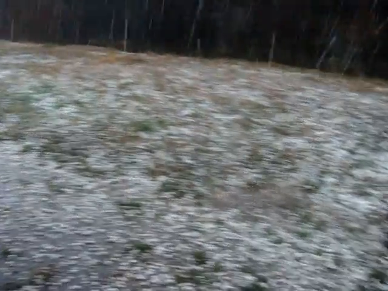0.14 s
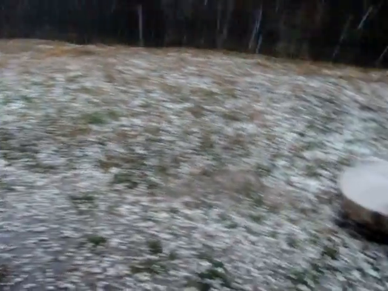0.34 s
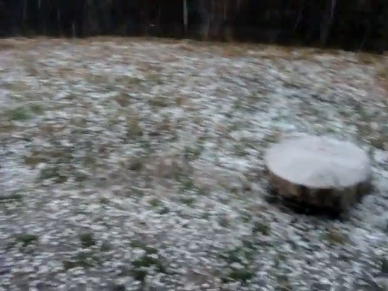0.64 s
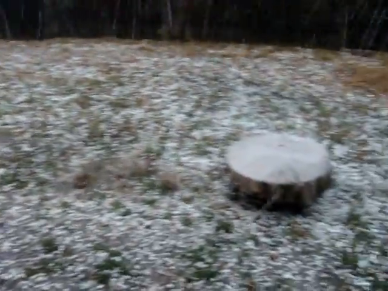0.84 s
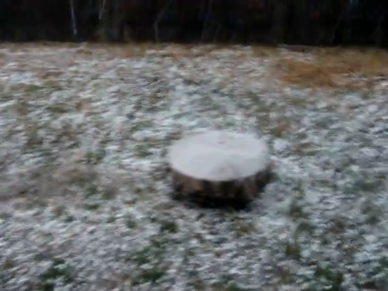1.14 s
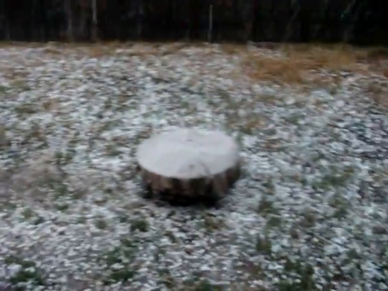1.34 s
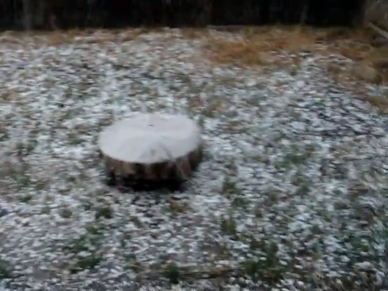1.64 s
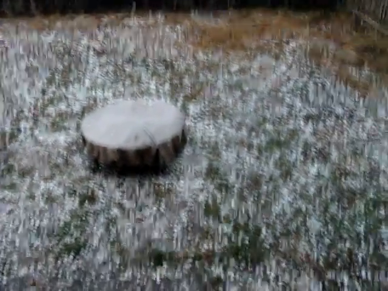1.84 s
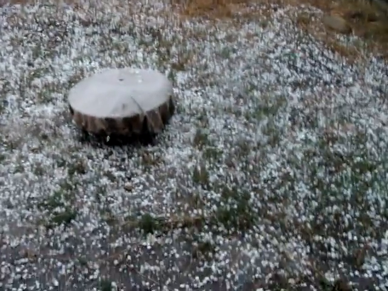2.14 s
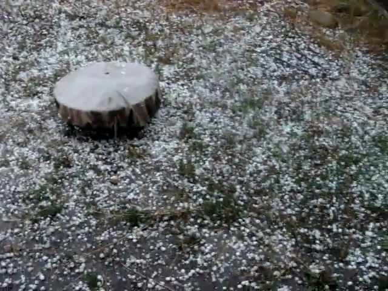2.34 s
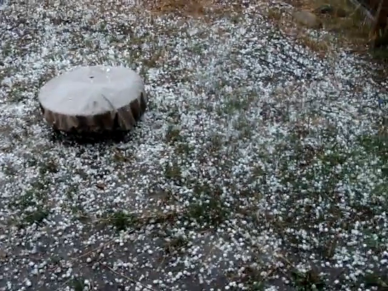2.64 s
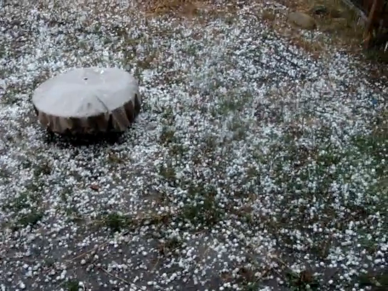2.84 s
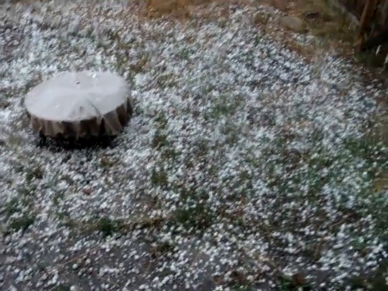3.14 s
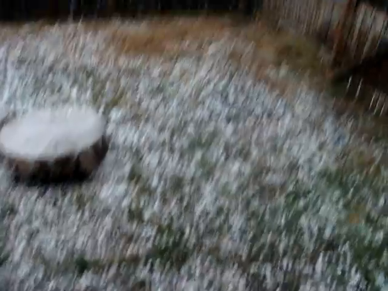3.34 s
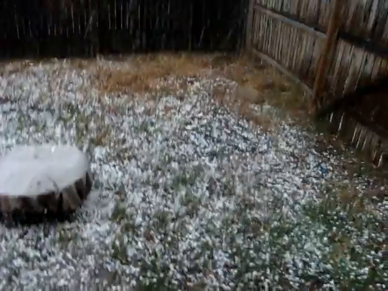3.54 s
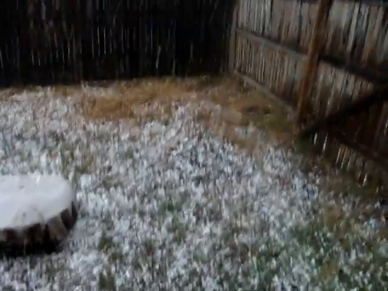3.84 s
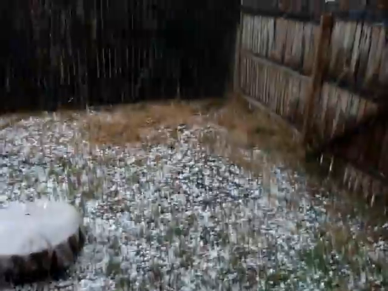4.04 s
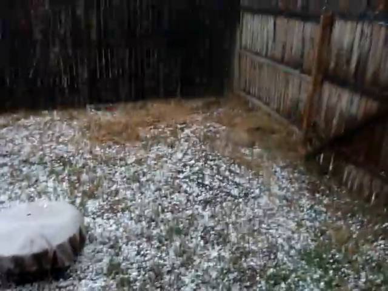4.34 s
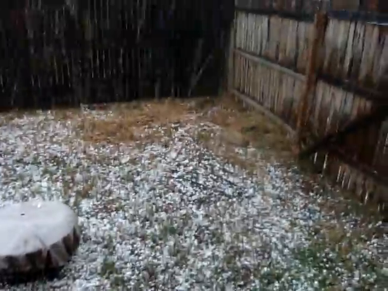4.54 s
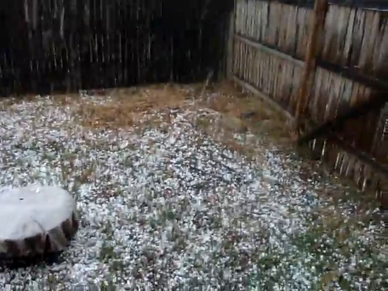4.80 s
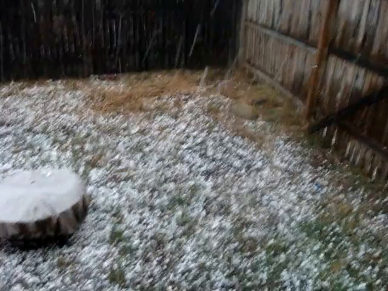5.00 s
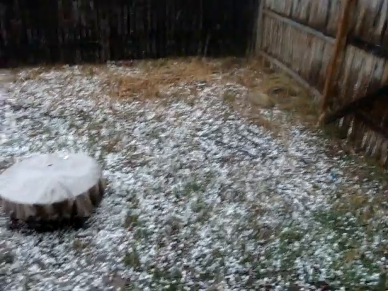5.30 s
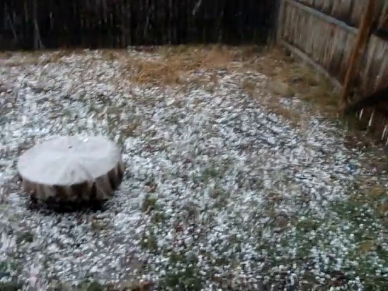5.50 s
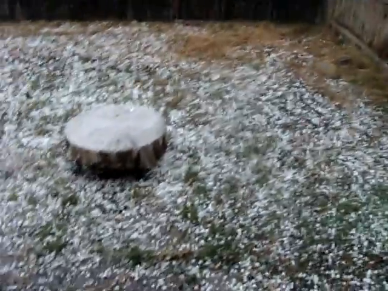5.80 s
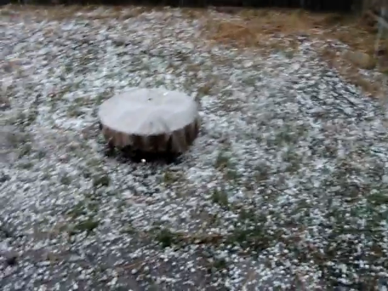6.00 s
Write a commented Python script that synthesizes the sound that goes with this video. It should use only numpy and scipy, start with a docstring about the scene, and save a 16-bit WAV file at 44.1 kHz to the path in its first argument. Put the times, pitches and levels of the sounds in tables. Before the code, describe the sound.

From 0 to about 6.2 seconds, heavy hail pounds a fenced yard without a break, already at full strength at the start. Far stones blend into a broad, mid-bright wash; nearer ones patter on lawn and paving, clack on fallen ice and fizz into splinters. Beneath lies a dull roar and rapid drumming on wooden fence and roof. Very short, snapping cracks land close by at 0.2, 0.7 and 1.3 seconds, then in a tight cluster from 1.7 to 1.9, the loudest at 1.9. More follow at 2.9, 3.9, 4.4, 5.2 and a strong one near 5.6. Low board knocks appear faintly around 1.4, 4.1 and 5.7. Quick flurries ripple the level, which eases slightly at the very end. Mono, dry and close, with softened top treble and brief ducking after hard peaks.

```python
"""A fenced back yard, heard from the edge of a paved patio, under heavy hail.
Far stones merge into a wash of noise and a low roar, shaped by smooth spectra. Nearer stones are random
clicks: they patter on the lawn, click on ice already lying there, fizz as splinters and drum on wood.
Big stones knock on wood by setting off ringing filters. Others crack close by, each a short ping with
a burst of tiny snaps, and their peaks make the mono recorder's limiter duck."""
import sys
import numpy as np
from scipy import signal
from scipy.fft import rfft, irfft, next_fast_len
from scipy.io import wavfile

SR = 44100
rng = np.random.default_rng(int(sys.argv[2]) if len(sys.argv) > 2 else 0)


def store_pcm(level_fs):
    """Save levels as 16-bit WAV."""
    pcm = np.round(np.clip(level_fs, -1, 1) * 32767).astype(np.int16)
    wavfile.write(sys.argv[1], SR, np.atleast_2d(pcm).T)


N = 271656

# Slow swell of the hail on the ground: [t/s, level/dB before flurries]
GROUND_SWELL = [(0, -19), (0.55, -18), (0.85, -19), (1.25, -18.0), (1.5, -20), (2.05, -18.5), (2.2, -18.5),
                (2.75, -18.0), (3.1, -18.5), (4.05, -18.0), (4.25, -19), (4.5, -18), (4.9, -18.5),
                (5.5, -18.5), (6.16, -20.5)]
# Slow swell of the hail on fence and roof: [t/s, level/dB before flurries]
WOOD_SWELL = [(0, -23.0), (0.3, -24), (0.55, -21), (0.8, -24.5), (1.2, -23), (1.55, -24.5), (1.9, -25),
              (2.25, -22.5), (2.55, -24), (3.5, -24), (4.5, -25), (4.85, -23), (5.2, -25.5), (5.4, -21.5),
              (5.6, -25), (5.88, -21.5), (6.16, -27)]
# Stones landing close by: [t/s, relative level/dB, pitch f/Hz, time for the crunch to fall to 1/e /s]
CLOSE_STONES = [(.174, -1, 8000, 0.00069), (0.672, -12, 8600, 0.0039), (0.68, -1, 2800, 0.00084),
                (.734, 0.5, 3220, .001), (1.307, -4.5, 4170, 0.0043), (1.407, -11, 7400, .001),
                (1.462, -14, 7000, 0.00091), (1.689, -1.5, 3280, 0.00054), (1.779, -1, 3500, 0.00057),
                (1.806, 2, 6500, 0.00044), (1.853, 1, 4100, 0.0032), (1.883, 0, 5040, 0.00086),
                (1.9037, 5.5, 3820, 0.00053), (2.159, -6, 3200, .006), (2.739, -5, 3770, 0.0041),
                (2.904, 1.5, 3900, 0.00077), (3.126, -9, 3200, .0017), (3.206, -8, 4150, .0033),
                (3.526, -7, 5470, .0008), (3.582, -4, 2970, 0.0019), (3.854, 0.5, 5470, 0.00077),
                (4.414, -0.5, 3530, 0.0022), (4.568, -1, 3400, 0.0012), (4.943, -4, 4200, 0.00044),
                (5.003, -8, 4500, 0.00085), (5.194, 1, 2480, 0.0015), (5.453, -2, 3380, .001),
                (5.629, 4, 3400, 0.00062), (5.664, -5, 6960, .001), (5.974, -2, 2780, 0.0037),
                (6.116, -6, 3920, 0.0055)]
# Big stones on wood: [t/s, relative level/dB, f/Hz around which the boards answer most]
WOOD_HITS = [(.018, -18, 1040), (.160, -20, 252), (1.290, -19, 1000), (1.351, -13.5, 260),
             (1.355, -16, 780), (1.411, -12, 262), (1.425, -23, 620), (1.623, -18, 1210), (3.112, -19, 340),
             (3.472, -20, 920), (3.82, -16, 340), (4.061, -13, 190), (4.183, -14.5, 326),
             (4.724, -16, 1310), (4.917, -15, 1550), (5.397, -20, 900), (5.429, -15.5, 340),
             (5.717, -14, 190), (5.741, -16, 647), (5.876, -20, 170), (5.907, -20, 517)]
# Ringing tones of the boards: [f/Hz, relative level/dB, time to fade by 60 dB /s]
BOARD_MODES = [(170, -9, 0.086), (226, -0.5, 0.063), (340, -4, 0.11), (473, 0, 0.033), (598, -2, 0.062),
               (775, 6.5, 0.041), (925, -6, .035), (1272, 2, 0.065), (1550, 5.5, 0.018)]
# Tone colour of hail on the ground: [f/Hz, relative level/dB]
GROUND_COLOUR = [(700, -16), (1100, -3), (1600, -1), (2400, 0.5), (3500, 1.5), (4400, -1.5), (5000, -5),
                 (5700, -10.5), (8000, -37)]
# Tone colour of tap edges and ice splinters: [f/Hz, relative level/dB]
SPLINTER_COLOUR = [(3500, -18), (5000, -19.5), (6000, -2), (7500, 0), (9000, -1.5), (10000, -3.5)]
# Tone colour of the roar from fence and roof: [f/Hz, relative level/dB]
ROAR_COLOUR = [(25, -34.5), (50, -24.5), (100, -11.5), (150, -6.5), (220, -4.5), (300, -3.5), (450, -1.5),
               (700, 2), (1000, -2), (1500, -6.5), (3000, -26.5)]

CUTOFF_HZ = 10100  # top of the recorded treble
SPLINTERS_DB = -9.5  # typical level of the splinters against the hail on the ground
FLURRIES_PER_S = 18  # the stones come in quick flurries
# Typical size of the level changes: flurries on ground and wood, and separate sprays of splinters
GROUND_FLURRY_DB, WOOD_FLURRY_DB, SPLINTER_FLURRY_DB = 0.68, 0.64, -0.5


def from_db(db):
    """Turn decibels into an amplitude factor."""
    return 10 ** (np.asarray(db) / 20)


def rms_one(x):
    """Scale a sound to an average power of one."""
    return x / np.sqrt(np.mean(x ** 2) + 1e-20)


def in_time(rows):
    """Join the points of a curve by straight lines, giving one value per sample."""
    times_s, values = np.transpose(rows)
    return np.interp(np.arange(N) / SR, times_s, values)


def coloured(x, spectrum):
    """Give a sound a smooth spectrum that falls 20 dB per octave beyond its ends, at unit power."""
    hz, db = np.transpose(spectrum)
    size = next_fast_len(N)
    bin_hz = np.arange(size // 2 + 1) * SR / size
    octave = np.log2(np.maximum(bin_hz, 1))
    table_octave = np.log2(hz)
    outside = np.abs(octave - np.clip(octave, table_octave[0], table_octave[-1]))
    gain = from_db(np.interp(octave, table_octave, db) - 20 * outside)
    return rms_one(irfft(rfft(x, size) * gain, size)[:N])


def drift(rate):
    """Wander at random with rms 1, heading for a new value `rate` times a second."""
    knots = rng.standard_normal(2000)
    position = np.arange(N) / SR * rate
    return rms_one(np.interp(position, np.arange(len(knots)), knots))


def ring(clicks, hz, t60):
    """A unit click starts a fading cosine of height about 1; the filter removes the bass below it."""
    radius = from_db(-60 / (t60 * SR))
    angle = 2 * np.pi * hz / SR
    feedback = [1, -2 * radius * np.cos(angle), radius * radius]
    return signal.lfilter([.5, 0, -.5], feedback, clicks + 1e-18)


def impacts(per_s, spread_db, clump_db=2.5):
    """Stones land at random, in little clumps; most are small or far, a few are large or near."""
    sizes = from_db(spread_db * np.minimum(rng.exponential(1, N), 3))
    signs = rng.choice([-1, 1], N)
    chance = per_s * from_db(clump_db * drift(70)) / SR
    return sizes * signs * (rng.random(N) < chance)


def grains(clicks, low_hz, high_hz, cycles, count):
    """Each impact rings at one of several pitches, fading 60 dB in `cycles`; high ones are sharper."""
    dealt = rng.integers(0, count, N)
    total = np.zeros(N)
    for k, hz in enumerate(np.geomspace(low_hz, high_hz, count)):
        total += hz * ring(clicks * (dealt == k), hz, cycles / hz)
    return rms_one(total)


def drumming():
    """Dull raps on fence and roof ring low, over a low roar blurred by distance."""
    raps = grains(impacts(200, spread_db=4.0), low_hz=233, high_hz=946, cycles=15.5, count=16)
    far_hits = rms_one(impacts(700, spread_db=2.0))
    roar = coloured(rng.standard_normal(N) + from_db(-5.5) * far_hits, ROAR_COLOUR)
    return rms_one(roar + from_db(-9) * raps)


def patter():
    """Stones on lawn and paving: a far wash, dry taps, soft pats and short clacks of ice on ice."""
    wash = rng.standard_normal(N)
    taps = rms_one(impacts(1300, spread_db=1.5))
    pats = grains(impacts(1200, spread_db=5.0), low_hz=900, high_hz=4500, cycles=3.0, count=14)
    clacks = grains(impacts(550, spread_db=2.0), low_hz=1450, high_hz=4500, cycles=11.0, count=20)
    ground = coloured(from_db(5) * wash + from_db(-1) * taps + from_db(-7.5) * pats, GROUND_COLOUR)
    return rms_one(ground + from_db(-7.0) * clacks), taps


def sizzle(taps):
    """The sharp edge of each tap joins high ringing ticks of ice splinters and an uneven fizz of noise."""
    ticks = grains(impacts(700, spread_db=2.5), low_hz=5000, high_hz=9630, cycles=40.0, count=12)
    fizz = from_db(2.6 * drift(40)) * rng.standard_normal(N)
    return coloured(fizz + from_db(-6.5) * taps + from_db(-3.0) * ticks, SPLINTER_COLOUR)


def knocks(level_db, width_octaves):
    """Where a big stone lands decides which ringing tones of the boards answer most."""
    times_s, db, centre_hz = np.transpose(WOOD_HITS)
    starts = np.round(times_s * SR).astype(int)
    out = np.zeros(N)
    for hz, mode_db, t60 in BOARD_MODES:
        share = np.exp(-(np.log2(hz / centre_hz) / width_octaves) ** 2)
        chance_db = rng.normal(0, 1, len(starts))
        clicks = np.zeros(N)
        clicks[starts] = share * from_db(db + level_db + mode_db + chance_db)
        out += ring(clicks, hz, t60)
    band = signal.butter(2, [110, 2200], "band", fs=SR, output="sos")
    return signal.sosfilt(band, out)


def cracks(ping_db, crunch_db):
    """A close stone pings briefly at its pitch while it crumbles in a burst of tiny snaps."""
    out = np.zeros(N + SR)  # spare room for the last crack
    t = np.arange(SR // 50) / SR
    for start_s, db, hz, length_s in CLOSE_STONES:
        ping = np.sin(2 * np.pi * hz * t)
        snaps = rms_one(ring(rng.standard_normal(len(t)), hz, 4.5 / hz))
        fade = np.exp(-(t / length_s) ** 2)
        crack = (from_db(ping_db) * ping + from_db(crunch_db) * snaps) * fade
        at = round(start_s * SR)
        out[at:at + len(t)] += from_db(db) * crack
    return out[:N]


def scene():
    """Gather all the hail at one microphone; swells and flurries set how hard it falls."""
    wood_gain = from_db(in_time(WOOD_SWELL) + WOOD_FLURRY_DB * drift(FLURRIES_PER_S))
    wood = wood_gain * drumming() + knocks(level_db=-1.5, width_octaves=0.78)
    ground, taps = patter()
    ground_gain = from_db(in_time(GROUND_SWELL) + GROUND_FLURRY_DB * drift(FLURRIES_PER_S))
    splinter_gain = from_db(SPLINTERS_DB + SPLINTER_FLURRY_DB * drift(FLURRIES_PER_S))
    hail = ground_gain * (ground + splinter_gain * sizzle(taps))
    close = cracks(ping_db=-5.5, crunch_db=-10.5)
    return np.tile(hail + wood + close, (2, 1))  # the same sound in both channels


def limiter(x, ceiling_db, release_db_per_s, attack_s, lead_s):
    """Gain drops just ahead of a peak and creeps back up; what slips through is rounded off."""
    t = np.arange(N) / SR
    peak_db = 20 * np.log10(np.abs(x).max(axis=0) + 1e-9)
    over_db = np.maximum(peak_db - ceiling_db, 0)
    recovery_db = release_db_per_s * t
    needed_db = np.maximum.accumulate(over_db + recovery_db) - recovery_db
    early_db = np.interp(t + lead_s, t, needed_db)  # look slightly ahead
    lag = np.exp(-1 / (attack_s * SR))
    cut_db = signal.lfilter([1 - lag], [1, -lag], early_db)
    held = x * from_db(-cut_db)
    return held / (1 + (held / .68) ** 8) ** (1 / 8)  # smooth bend towards a height of 0.68


def record(dry):
    """The limiter holds the peaks down, then a steep filter cuts the highest treble."""
    held = limiter(dry, ceiling_db=-3.0, release_db_per_s=40, attack_s=.0011, lead_s=.0006)
    low_pass = signal.firwin(401, CUTOFF_HZ, window=("kaiser", 9), fs=SR)
    return signal.fftconvolve(held, low_pass[None], mode="same", axes=1)


dry = scene()
out = record(dry)
store_pcm(out)
```